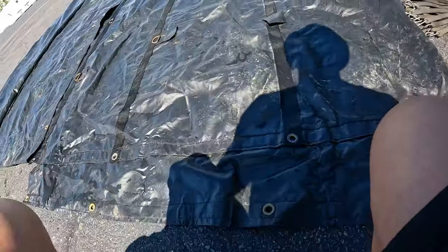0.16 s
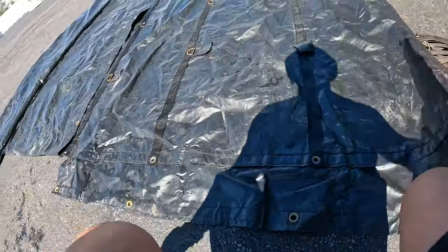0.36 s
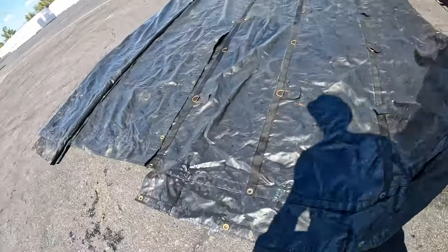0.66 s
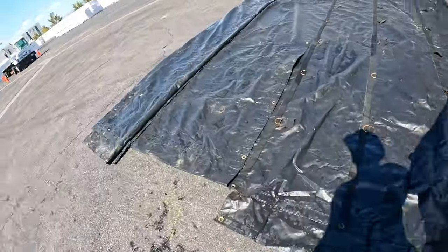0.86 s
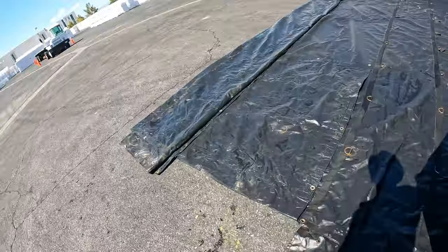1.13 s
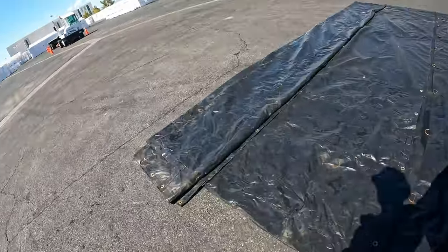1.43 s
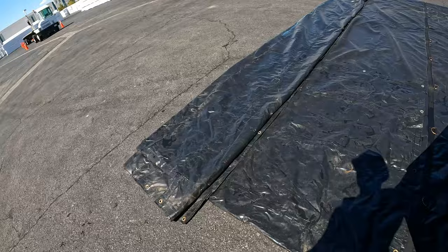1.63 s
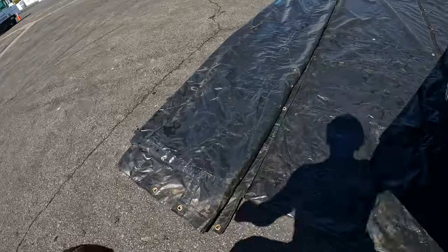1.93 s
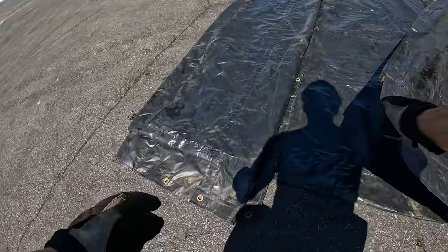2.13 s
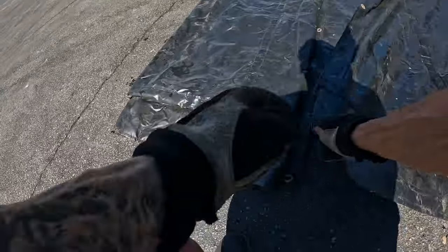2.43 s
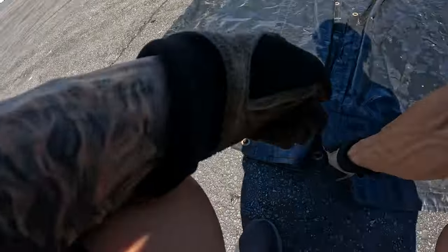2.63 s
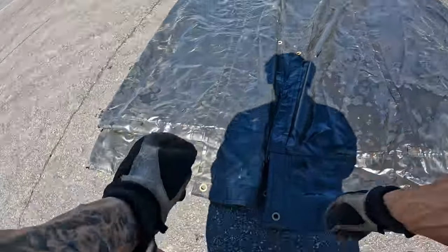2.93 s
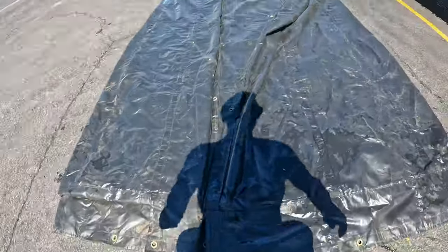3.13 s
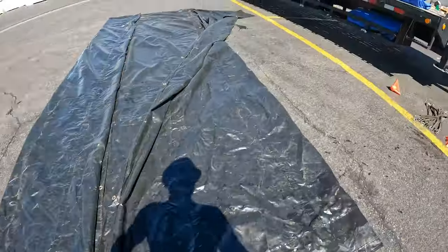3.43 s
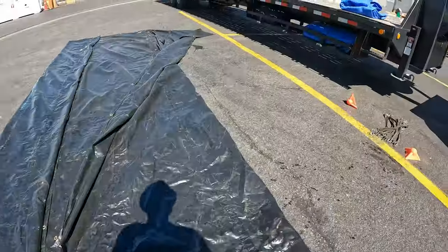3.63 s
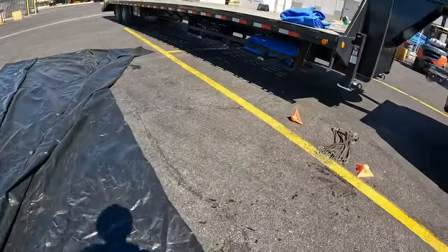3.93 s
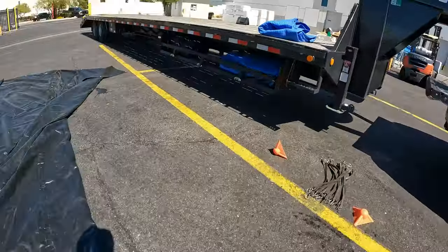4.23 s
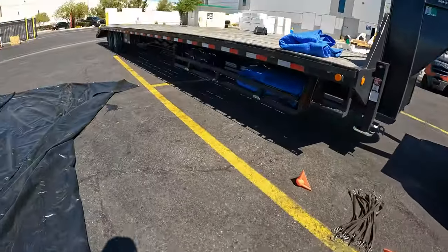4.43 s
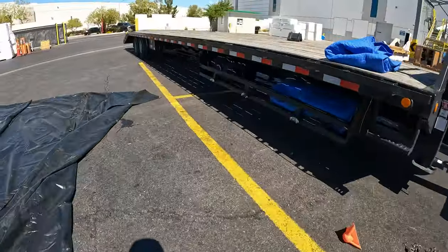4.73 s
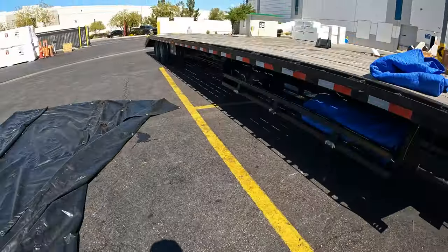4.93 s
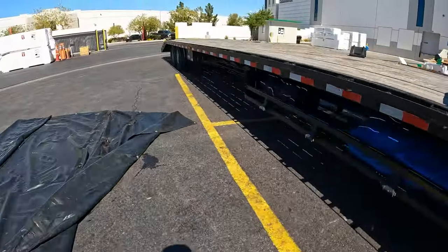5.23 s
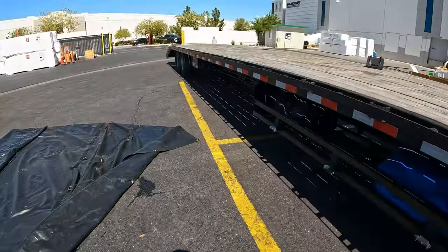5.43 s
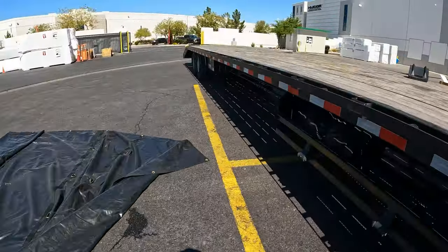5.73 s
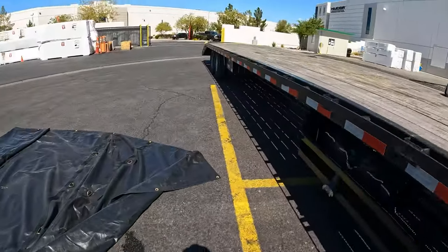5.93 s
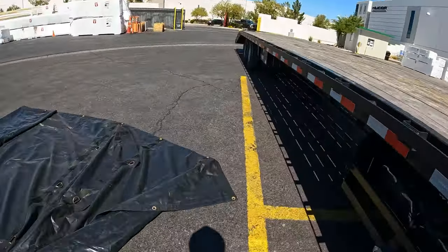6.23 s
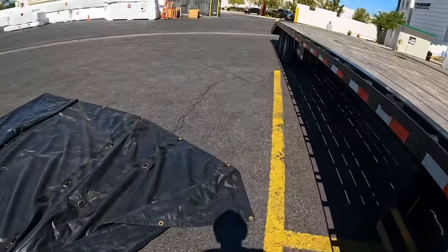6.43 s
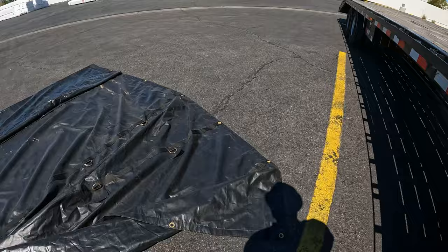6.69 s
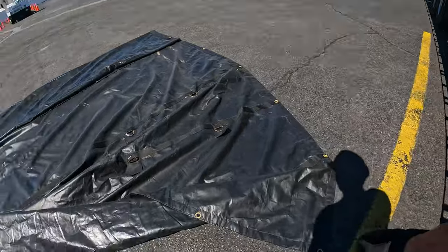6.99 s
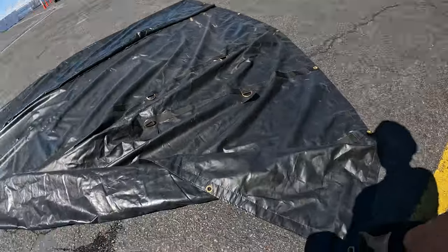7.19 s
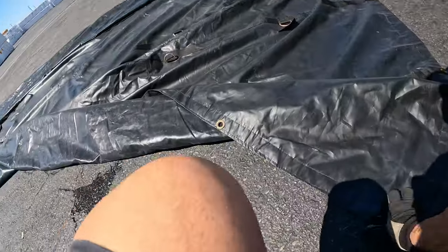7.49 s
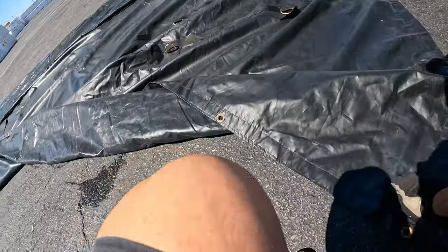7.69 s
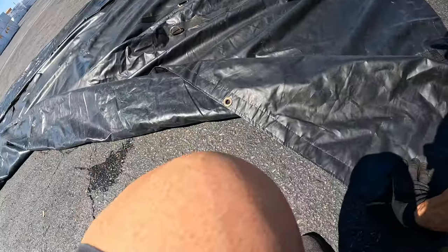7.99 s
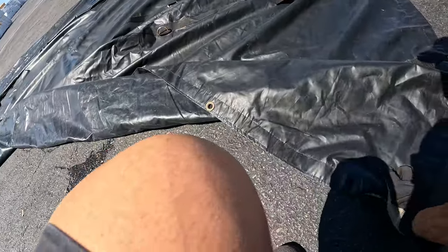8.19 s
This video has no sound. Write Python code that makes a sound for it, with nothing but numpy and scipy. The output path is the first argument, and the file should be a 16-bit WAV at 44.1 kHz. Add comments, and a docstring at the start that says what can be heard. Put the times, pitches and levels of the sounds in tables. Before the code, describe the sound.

Outdoors in a paved yard, idling engines drone low and steady with soft air thumps on the microphone. Close by, a heavy vinyl tarp is tugged with crackles and sharp snaps, then flops down with a deep billowing slap and dull pops. A pause follows, with a faint machine whirring up and away, before the sheet is bunched and dragged with a rising crunchy scrape.

```python
"""Idling engines rumble over a yard, a fainter machine whirs, and puffs of air buffet the microphone. Close by,
a heavy vinyl tarp is tugged along, flopped onto the asphalt and, after a pause, gathered up; at the end a
scrape runs hard over the ground. Engines are wandering sine tones; yard and puffs are shaped noise; the machine
is a coloured rush with whines. The vinyl is filtered noise and random impulses: buckling panels, crackling
creases and hissing layers, with single snaps and pops made by kicking damped resonances."""
import sys
import numpy as np
from scipy import signal
from scipy.fft import rfft, irfft, next_fast_len
from scipy.io import wavfile
from scipy.ndimage import uniform_filter1d, map_coordinates

SR = 44100
rng = np.random.default_rng(int(sys.argv[2]) if len(sys.argv) > 2 else 0)


def store_wav(level_fs):
    """Save 16-bit WAV to argv[1]."""
    pcm = np.round(np.clip(np.atleast_2d(level_fs), -1, 1) * 32767)
    wavfile.write(sys.argv[1], SR, pcm.T.astype(np.int16))


N = 368235  # samples, 8.35 s


def amp(db):
    """Decibels to gain."""
    return 10 ** (np.asarray(db) / 20)


def unit(x):
    """Scale to rms 1."""
    return x / np.sqrt(np.mean(x ** 2) + 1e-20)


def along(points, hz):
    """Read (frequency_hz, value) points on a log frequency axis."""
    point_hz, value = np.transpose(points)
    return np.interp(np.log(hz + 1), np.log(point_hz + 1), value)


def curve(points):
    """Turn (time_s, level_db) points into one gain per sample."""
    return amp(np.interp(np.arange(N) / SR, *np.transpose(points)))


def envelope(start, hold, rise, fall):
    """Swell up to start, hold, then die away; rise and fall are the times for 20 dB."""
    t = np.arange(N) / SR
    before = np.maximum(start - t, 0)
    after = np.maximum(t - start - hold, 0)
    return amp(-20 * (before / rise + after / fall))


def wobble(rate):
    """A smooth random curve, rate knots a second."""
    knots = rng.standard_normal(int(N * rate / SR) + 4)
    return map_coordinates(knots, [np.arange(N) * rate / SR])


def filtered(x, response):
    """Multiply the spectrum of x by a response of frequency."""
    size = next_fast_len(x.shape[-1] + 8192)  # padding gives the filter tails room
    spectrum = rfft(x, size) * response(np.fft.rfftfreq(size, 1 / SR))
    return irfft(spectrum, size)[..., :x.shape[-1]]


def coloured(x, colour):
    """Causal minimum-phase filter with the given spectrum, so that clicks keep their sharp fronts."""
    size = 4096
    log_gain = np.log(amp(along(colour, np.fft.rfftfreq(size, 1 / SR))))
    cepstrum = irfft(log_gain)
    cepstrum[1:size // 2] *= 2  # fold the energy forward in time
    cepstrum[size // 2 + 1:] = 0
    impulse = irfft(np.exp(rfft(cepstrum)))
    return signal.fftconvolve(x, impulse[None], axes=1)[:, :N]


# stereo spread by frequency: frequency_hz, side_filter_db (before the image opens out)
STEREO_WIDTH = [(60, -22), (200, -30.5), (380, -21.5), (700, -14.5), (1300, -9.5), (2400, -9.5),
                (8000, -11), (14000, -4.5)]


def ports(pair):
    """Two unrelated signals become the mid and side of what two close microphone ports pick up."""
    mid, side = filtered(pair, lambda hz: np.array([np.ones_like(hz), amp(along(STEREO_WIDTH, hz))]))
    return np.array([mid + side, mid - side])


def add(track, s, sound):
    """Mix a sound in at time s."""
    part = track[..., max(round(s * SR), 0):][..., :sound.shape[-1]]
    part += sound[..., :part.shape[-1]]


def cracks(rate, spread_db, size=N):
    """Two trains of random impulses, rate per second, of very unequal strength, rms 1."""
    chance, strength = rng.random((2, size)), rng.standard_normal((2, size))
    polarity = rng.choice([-1, 1], (2, size))
    loudness = amp(spread_db * np.minimum(strength, 2))  # cap the rare giants
    return unit((chance < rate / SR) * polarity * loudness)


def facets(x, depth_db):
    """Patches of wrinkled sheet favour their own pitches: random gains over frequency and time."""
    z = signal.stft(x, nperseg=256)[2]
    field = uniform_filter1d(rng.standard_normal(z.shape[1:]), size=3, axis=0)
    field = uniform_filter1d(field, size=5, axis=1)
    return signal.istft(z * amp(depth_db * unit(field)), nperseg=256)[1][:, :x.shape[1]]


def rustle(colour, rate, rub_db, clump_db, facet_db):
    """Tiny buckles arriving in clumps over smooth rubbing, rms 1."""
    buckles = cracks(rate, spread_db=4) * amp(clump_db * wobble(45))
    rubbing = amp(rub_db) * rng.standard_normal((2, N))
    return unit(ports(coloured(facets(buckles + rubbing, facet_db), colour)))


def resonance(hz, centre, q):
    """Band-pass response of a damped flap of vinyl."""
    return 1j * hz * centre / q / (centre ** 2 - hz ** 2 + 1j * hz * centre / q)


def tone(hz, drift, blur=0):
    """A note of rms near 1 that wanders in timing (drift, s), phase (blur, rad) and strength."""
    t = np.arange(N) / SR + drift * wobble(1.5)
    phase = 2 * np.pi * (hz * t + rng.random()) + blur * wobble(40)
    return np.sqrt(2) * np.sin(phase) * amp(.7 * wobble(3))


# idling engine notes: pitch_hz, level_db (rms before the slow wander)
ENGINE_NOTES = [(35.1, -30.5), (59.4, -42), (83.8, -25.5), (122.3, -47), (128.3, -30.5), (134, -38),
                (167.6, -35), (210.6, -55), (240, -50.5)]
# strongest exhaust note over time: time_s, level_db (rms before the slow wander)
EXHAUST_LEVEL = [(0, -15), (.55, -17), (.8, -21.5), (2.5, -32.5), (3.5, -26), (4.4, -20.5), (6, -23),
                 (8.35, -23)]
EXHAUST_HZ = 69.97


def engines():
    """Idling engines beat against one another as steady low notes that drift slightly."""
    exhaust = curve(EXHAUST_LEVEL) * tone(EXHAUST_HZ, drift=0.00031)
    return exhaust + sum(amp(db) * tone(hz, drift=0.00059) for hz, db in ENGINE_NOTES)


# background rumble over time: time_s, level_db (rms)
RUMBLE_LEVEL = [(0, -20.5), (1.15, -24.5), (2.0, -16.5), (2.5, -23), (3.6, -20.5), (5, -23), (8.35, -25.5)]
# rumble spectrum: frequency_hz, relative_level_db (per Hz)
RUMBLE_COLOUR = [(8, -4), (25, 2.5), (110, 2.5), (190, -6), (350, -10), (550, -21), (900, -25.5),
                 (1900, -38.5), (3300, -44), (4300, -50.5), (7000, -57.5), (10000, -70.5), (12500, -77),
                 (15000, -90.5)]
# puffs of air: centre_s, level_db (at the centre), width_s (Gaussian sigma)
AIR_PUFFS = [(0.879, -9.5, 0.039), (1.58, -20, 0.057), (2.007, -11.5, 0.028), (3.167, -23, 0.14),
             (6.747, -18, 0.04)]
# puff spectrum: frequency_hz, relative_level_db (per Hz)
AIR_COLOUR = [(10, -7.5), (30, 9), (100, 5.5), (200, -7.5), (500, -26.5), (2000, -75), (8000, -115)]


def shaped_noise(colour):
    """Steady stereo noise with the given spectrum, rms 1."""
    noise = rng.standard_normal((2, N))
    return unit(ports(filtered(noise, lambda hz: amp(along(colour, hz)))))


def yard():
    """The broad rumble of machines and traffic, with low bursts as air puffs on the microphone."""
    t = np.arange(N) / SR
    puff = sum(amp(db) * np.exp(-((t - s) / width) ** 2 / 2) for s, db, width in AIR_PUFFS)
    return curve(RUMBLE_LEVEL) * shaped_noise(RUMBLE_COLOUR) + puff * shaped_noise(AIR_COLOUR)


# fan rush spectrum: frequency_hz, relative_level_db (per Hz)
FAN_COLOUR = [(150, -4), (300, 7), (520, 2.5), (780, 3.5), (920, -4), (1200, 0.5), (1850, -11),
              (2150, -10.5), (2600, -16.5), (3200, -11), (3850, -17), (4400, -20), (8000, -35),
              (14000, -55)]
# thin whines: pitch_hz, level_db (against the rush, before the flutter)
MACHINE_WHINES = [(665.5, -8.5), (699.8, -12), (753.7, -17), (1196, -19), (2932, -30.5), (3494, -33.5),
                  (3714, -30)]
MACHINE_START_DB, MACHINE_FADE_DB_PER_S = -41.5, 2.16  # slowly grows fainter
FACED_S, FACED_WIDTH_S, FACED_BOOST_DB = 4.19, 0.64, 14  # swells while the microphone faces it


def machine():
    """A distant machine, lifted when faced: the rush of its fan, a fine clatter and a few thin whines."""
    t = np.arange(N) / SR
    facing = np.exp(-((t - FACED_S) / FACED_WIDTH_S) ** 2 / 2)
    level = amp(MACHINE_START_DB - MACHINE_FADE_DB_PER_S * t + FACED_BOOST_DB * facing)
    whine = sum(amp(db + 3 * wobble(14)) * tone(hz, drift=.002, blur=.6) for hz, db in MACHINE_WHINES)
    rush = rustle(FAN_COLOUR, rate=1600, rub_db=6, clump_db=1.5, facet_db=1.5)
    return level * (whine + rush)


# crackling creases: frequency_hz, relative_level_db (per Hz)
CREASE_COLOUR = [(500, -51), (1200, 8), (1800, 1), (2600, 4), (3600, 0), (4700, -9.5), (8000, -25.5),
                 (15000, -42)]
# hiss of sliding layers: frequency_hz, relative_level_db (per Hz)
HISS_COLOUR = [(800, -28), (2500, -5.5), (4500, 4.5), (6700, 2.5), (8200, -2), (10000, -10), (12500, -14),
               (14000, -27.5), (15500, -30)]
LET_GO_S = 0.035  # a movement dies by 20 dB in this time


def handling(moves, panel_colour, slide_db):
    """Worked in the gloves, small panels buckle, creases crackle, and layers slide in step with the creases."""
    crinkle = buckle = np.zeros(N)
    for s, hold, rise, crinkle_db, buckle_db in moves:
        effort = envelope(s, hold, rise, LET_GO_S)
        crinkle = np.hypot(crinkle, amp(crinkle_db) * effort)
        buckle = np.hypot(buckle, amp(buckle_db) * effort)
    panels = buckle * rustle(panel_colour, rate=1400, rub_db=0, clump_db=1, facet_db=1.5)
    creases = crinkle * rustle(CREASE_COLOUR, rate=1400, rub_db=-2, clump_db=1.3, facet_db=2)
    hiss = amp(slide_db) * crinkle * rustle(HISS_COLOUR, rate=3000, rub_db=0, clump_db=1.2, facet_db=1)
    return panels + creases + hiss


# tugs on the edge: start_s, hold_s, rise_s (for 20 dB), crinkle_db, buckle_db
EDGE_TUGS = [(0, 0.05, 0.12, -43.5, -36.5), (.14, 0.086, 0.081, -44.5, -39), (.34, 0.087, 0.11, -53.5, -38),
             (.5, 0.16, 0.34, -52, -53), (1.33, 0.054, .05, -51.5, -43), (1.7, 0.032, 0.26, -56.5, -53)]
# panels near the edge: frequency_hz, relative_level_db (per Hz)
EDGE_PANEL_COLOUR = [(200, -11), (450, 2.5), (850, 5.5), (1050, -9.5), (1400, -6), (4000, -38),
                     (15000, -68.5)]


def carrying():
    """Tugs carry the edge along, each a swell of buckling and crackle that is quickly let go."""
    return handling(EDGE_TUGS, EDGE_PANEL_COLOUR, slide_db=-8.5)


def kicked_buckles(rows, q, t60, tail_db, brightness):
    """A buckle flips in one kick; the sheet around it shivers for a moment."""
    out, t = np.zeros((2, N)), np.arange(SR // 10) / SR
    for s, db, pitch in rows:
        kick = amp(tail_db - 60 * t / t60) * rng.standard_normal((2, len(t)))
        kick[0, 0] -= 1  # the flip itself, in the mid channel
        ring = filtered(kick, lambda hz: resonance(hz, pitch, q) / (1 + 1j * hz / (brightness * pitch)) ** 3)
        add(out, s, amp(db) * ring / np.abs(ring[0]).max())
    return ports(out)


# single creases snapping through: start_s, level_db (mid peak before colouring), pitch_hz
CREASE_SNAPS = [(0.018, -17, 3600), (0.194, -21.5, 2600), (0.217, -29, 4000), (0.404, -28.5, 2850),
                (.4614, -31.5, 2500), (0.558, -9, 2850), (0.5605, -16.5, 3200), (0.5713, -16.5, 2850),
                (0.5951, -16.5, 3200), (0.599, -21, 3380), (1.478, -28, 2200), (1.565, -30, 3000),
                (2.1225, -17.5, 2830), (2.166, -15.5, 2200), (2.19, -19.5, 2480), (2.214, -16, 2100),
                (2.731, -28.5, 3270), (2.756, -31, 2870), (2.818, -28.5, 2900), (2.824, -28.5, 3270),
                (2.938, -32, 3080), (7.321, -30, 2740), (7.5048, -24, 2830), (7.519, -28, 2980),
                (7.646, -26.5, 3180), (7.731, -23.5, 2600), (8.007, -30.5, 3300), (8.2175, -20, 4200)]
# filter on the snaps: frequency_hz, gain_db
SNAP_FILTER = [(500, -6), (1500, -5.5), (8000, -11), (10000, -15), (15000, -14)]


def snapping_creases():
    """Single creases snap through as bright, damped ticks."""
    ticks = kicked_buckles(CREASE_SNAPS, q=2.5, t60=.03, tail_db=-6, brightness=3)
    return coloured(ticks, SNAP_FILTER)


# brushes of glove, shoe and clothing: start_s, hold_s, rise_s (for 20 dB), level_db (rms in the hold)
LIGHT_BRUSHES = [(0.116, 0.095, 0.12, -55), (3.474, .07, .05, -60), (4.067, 0.024, .05, -59.5),
                 (6.205, .05, 0.27, -61.5), (6.704, 0.076, 0.055, -62.5), (7.002, 0.27, .2, -65),
                 (7.459, 0.3, .25, -53), (7.85, 0.035, 0.14, -61.5)]
# airy hiss of a brush: frequency_hz, relative_level_db (per Hz)
BRUSH_HISS_COLOUR = [(1500, -20.5), (4000, 3), (7200, 1), (8500, -6), (10000, -11), (12500, -9),
                     (15000, -24)]


def brushes():
    """Light sliding contact: a fine, airy hiss that dies quickly when the movement stops."""
    level = sum(amp(db) * envelope(s, hold, rise, LET_GO_S) for s, hold, rise, db in LIGHT_BRUSHES)
    return level * rustle(BRUSH_HISS_COLOUR, rate=3400, rub_db=-1, clump_db=1.0, facet_db=2.5)


# short runs of cracks in the vinyl, from scuffs, slaps and the landing sheet:
# start_s, level_db (mid rms over length_s), pitch_hz, length_s, q
CRACK_RUNS = [(0.119, -39, 2180, 0.074, 1.4), (0.132, -36.5, 2300, 0.02, 2.2),
              (0.957, -48, 2720, 0.028, 2.3), (1.304, -37, 1000, 0.032, 1),
              (1.307, -43.5, 1600, 0.062, 1.8), (1.824, -38.5, 1050, 0.025, 1.4),
              (1.846, -41.5, 1840, .018, 2.1), (1.997, -28.5, 566, 0.042, 2.5),
              (2.02, -31.5, 1080, 0.02, 0.98), (2.085, -40.5, 2600, .06, 1.8),
              (2.162, -34, 2180, .055, 0.86), (2.243, -40.5, 3410, 0.066, 1.4),
              (2.516, -42, 1680, 0.11, 0.83), (3.269, -46, 1050, 0.28, 1.7),
              (3.459, -37.5, 1050, 0.035, 1.3), (3.997, -46, 2380, 0.057, 2.6),
              (7.027, -37.5, 874, 0.069, 0.66), (7.229, -36.5, 800, 0.065, 0.81),
              (7.239, -30.5, 650, 0.016, 1.7), (7.226, -41.5, 2010, 0.062, 0.91),
              (7.257, -40, 2700, .016, 0.99), (7.645, -42, 2500, 0.014, 0.62),
              (7.724, -39.5, 2490, 0.022, 0.78), (8.232, -44.5, 4150, 0.041, 0.93),
              (8.273, -38.5, 5570, 0.095, 2.8), (8.311, -39, 2420, .06, 2)]


def crack_runs():
    """The vinyl gives way in a quick run of cracks that swells and fades."""
    out = np.zeros((2, N))
    for s, db, pitch, length, q in CRACK_RUNS:
        u = np.arange(SR // 3) / SR / length
        swell = np.sqrt(u) * np.exp(-2 * u ** 2)
        run = cracks(rate=3500, spread_db=5, size=len(u)) * swell
        run = filtered(run, lambda hz: resonance(hz, pitch, q) ** 2 / (1 + 1j * hz / (2 * pitch)))
        levelled = run * np.sqrt(length * SR / (np.sum(run[0] ** 2) + 1e-12))
        add(out, s, amp(db) * levelled)
    return ports(out)


# whole panels popping over: start_s, level_db (mid peak), pitch_hz
PANEL_POPS = [(.196, -22, 1900), (.33, -26, 780), (.349, -25, 1400), (.407, -23.5, 894), (.4625, -27, 1040),
              (.488, -28, 850), (.5715, -25, 1100), (1.3055, -23.5, 900), (1.327, -24.5, 850),
              (1.446, -25, 1100), (1.476, -27, 1250), (1.749, -29, 1030), (1.817, -20, 900),
              (1.829, -19.5, 850), (1.946, -28, 1100), (1.976, -25, 1000), (2.085, -16, 670),
              (2.096, -15.5, 745), (2.1225, -8.5, 710), (2.141, -14, 890), (2.163, -21, 1210),
              (2.229, -11, 420), (2.322, -11.5, 412), (2.331, -14, 440), (2.403, -21, 513),
              (2.473, -19, 620), (2.544, -22, 430), (2.578, -12, 580), (2.656, -17, 473), (7.01, -31, 1500),
              (7.0325, -25.5, 1180), (7.043, -31, 1500), (7.061, -23.5, 790), (7.083, -22, 1150),
              (7.247, -20, 650), (7.267, -20, 750), (7.2825, -22.5, 1150), (7.511, -24.5, 930),
              (7.737, -26, 1100), (8.2175, -19, 970), (8.2635, -15.5, 850), (8.2765, -13, 880),
              (8.2945, -16, 1050), (8.301, -16, 870), (8.344, -21, 950)]


def popping_panels():
    """Whole panels flip over with dull pops, mostly lower and drier than the snapping creases."""
    return kicked_buckles(PANEL_POPS, q=2.8, t60=.04, tail_db=-19, brightness=1.8)


# billowing big panels: frequency_hz, relative_level_db (per Hz)
BILLOW_COLOUR = [(100, -32.5), (220, 1), (380, 3.5), (520, 1), (680, -1.5), (900, -18), (1500, -24),
                 (4000, -57.5)]
# buckling panels: frequency_hz, relative_level_db (per Hz)
BUCKLE_COLOUR = [(300, -19.5), (600, 10.5), (800, 8.5), (1200, 2.5), (1450, -2.5), (1900, -4), (4000, -27),
                 (15000, -68.5)]
# the sheet is laid down in one long glide; partway in, its bulk slaps onto the ground
GLIDE_S, GLIDE_HOLD_S, GLIDE_RISE_S, GLIDE_FALL_S = 2.264, 0.35, 0.64, 0.22  # rise and fall for 20 dB
SLAP_S, SLAP_HOLD_S, SLAP_RISE_S, SLAP_FALL_S = 2.076, 0.14, 0.1, 0.088
SLAP_LAG_S = 0.038  # the collapse reaches each finer layer this much later
# each layer's (glide dB, slap dB)
BILLOW_DB, BUCKLE_DB, CRINKLE_DB, SLIDE_DB = (-27, -26), (-43.5, -28), (-40, -34), (-45, -44.5)


def flop():
    """The sheet lands and pushes the air out: big panels billow, creases crackle, layers slide."""
    glide = envelope(GLIDE_S, GLIDE_HOLD_S, GLIDE_RISE_S, GLIDE_FALL_S)
    levels = []
    for layer, (glide_db, slap_db) in enumerate([BILLOW_DB, BUCKLE_DB, CRINKLE_DB, SLIDE_DB]):
        slap = envelope(SLAP_S + layer * SLAP_LAG_S, SLAP_HOLD_S, SLAP_RISE_S, SLAP_FALL_S)
        levels.append(np.hypot(amp(glide_db) * glide, amp(slap_db) * slap))
    billow, buckle, crinkle, slide = levels
    waves = billow * rustle(BILLOW_COLOUR, rate=2000, rub_db=2, clump_db=1, facet_db=1.5)
    panels = buckle * rustle(BUCKLE_COLOUR, rate=3000, rub_db=0, clump_db=1, facet_db=1.5)
    creases = crinkle * rustle(CREASE_COLOUR, rate=1600, rub_db=-4, clump_db=1.2, facet_db=2.2)
    hiss = slide * rustle(HISS_COLOUR, rate=3200, rub_db=2.5, clump_db=1.5, facet_db=1.5)
    return waves + panels + creases + hiss


def gliding(pitch, q):
    """Dense crackle through a resonance that follows pitch (Hz per sample), rms 1."""
    crackle = cracks(rate=1500, spread_db=4.5) * amp(1.5 * wobble(120))
    source = crackle + rng.standard_normal((2, N)) / 3
    hz, t, z = signal.stft(source, SR, nperseg=512)
    centre = np.interp(t, np.arange(N) / SR, pitch)
    ring = resonance(hz[:, None], centre, q) ** 2 / (1 + 1j * hz[:, None] / (2 * centre))
    even = ring / np.sqrt(centre)  # offsets the wider band at higher pitch
    return unit(ports(signal.istft(z * even, SR, nperseg=512)[1][:, :N]))


# run of the fold as the sheet lands: time_s, level_db, pitch_hz
FOLD_RUN = [(2.059, -53, 600), (2.088, -28, 644), (2.135, -25, 720), (2.168, -25.5, 1190),
            (2.225, -31.5, 1160), (2.285, -33.5, 970), (2.37, -53, 800)]
FOLD_Q = 2.2


def sweep():
    """A fold runs across the landing sheet: its crackle rises in pitch as the span tightens, then sags."""
    t = np.arange(N) / SR
    s, db, pitch = np.transpose(FOLD_RUN)
    level = amp(np.interp(t, s, db, left=-np.inf, right=-np.inf))  # silent outside the run
    return level * gliding(np.interp(t, s, pitch), FOLD_Q)


# grabs that bunch up a corner: start_s, hold_s, rise_s (for 20 dB), crinkle_db, buckle_db
CORNER_GRABS = [(6.7, 0.027, 0.047, -57, -44.5), (7.0, 1.2, 0.33, -55.5, -44.5),
                (7.5, 0.084, 0.13, -51.5, -43), (7.68, .06, 0.12, -43.5, -42.5),
                (7.86, 0.042, 0.27, -47.5, -51), (8.24, 0.016, 0.25, -42.5, -49),
                (8.285, .08, 0.051, -36.5, -38)]
# bunched panels: frequency_hz, relative_level_db (per Hz)
BUNCHED_PANEL_COLOUR = [(200, -27), (600, -2), (850, -0.5), (1050, -1.5), (1400, -5.5), (4000, -31.5),
                        (15000, -85)]


def gathering():
    """Grabs bunch up a corner, with buckling panels, crackling creases and a little slide."""
    return handling(CORNER_GRABS, BUNCHED_PANEL_COLOUR, slide_db=-7.0)


# a scrape over the asphalt at the end, softly at first and then hard: time_s, level_db
SCRAPE_LEVEL = [(8.0, -59), (8.13, -40), (8.2, -38), (8.25, -33.5), (8.3, -29), (8.35, -31)]
SCRAPE_HZ, SCRAPE_Q, SCRAPE_WANDER_OCT = 963, 2.3, 0.12  # the hollow note of the scrape


def scrape():
    """A scrape along the ground with a broad, wandering note."""
    level = amp(np.interp(np.arange(N) / SR, *np.transpose(SCRAPE_LEVEL), left=-np.inf))
    return level * gliding(SCRAPE_HZ * 2 ** (SCRAPE_WANDER_OCT * wobble(35)), SCRAPE_Q)


def scene():
    """The tarp over the noise of the yard."""
    background = engines() + yard() + machine()
    hands = carrying() + gathering() + brushes()
    buckles = snapping_creases() + crack_runs() + popping_panels()
    return background + hands + buckles + flop() + sweep() + scrape()


# the stereo image starts narrow and opens: time_s, side_gain_db
STEREO_OPENING = [(4.7, -47), (5.05, -7.5), (7, 2.5), (8.35, 4)]
TOP_HZ = 15700  # band limit


def record(dry):
    """The stereo image opens out, and nothing above the band limit is kept."""
    mid = dry.mean(axis=0)
    side = (dry[0] - dry[1]) / 2 * curve(STEREO_OPENING)
    return filtered(np.array([mid + side, mid - side]), lambda hz: hz < TOP_HZ)


dry = scene()
out = record(dry)
store_wav(out)
```